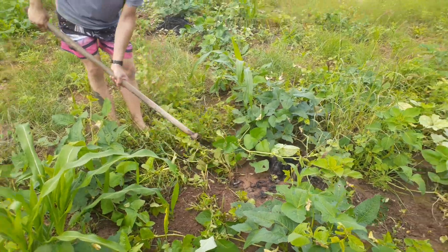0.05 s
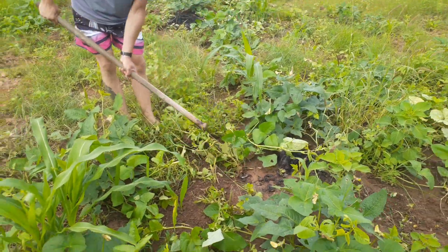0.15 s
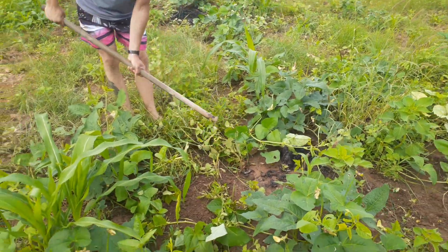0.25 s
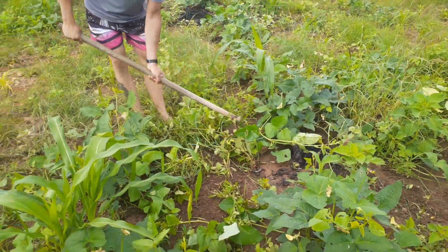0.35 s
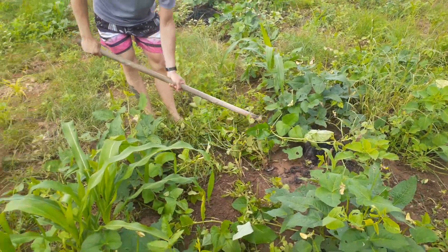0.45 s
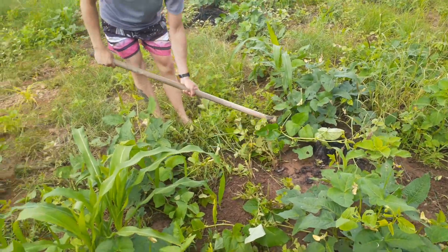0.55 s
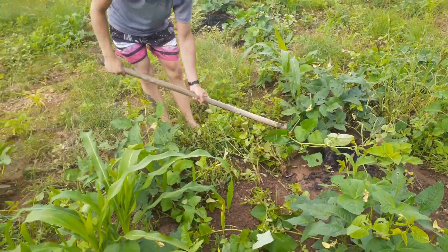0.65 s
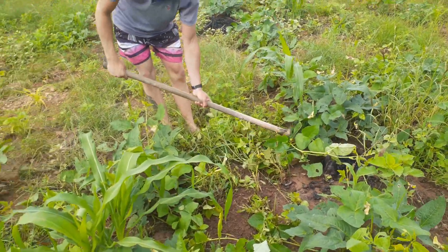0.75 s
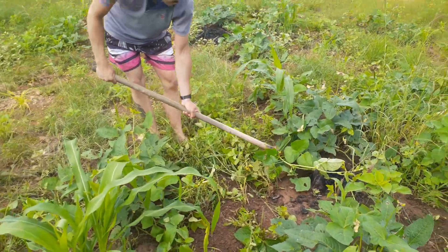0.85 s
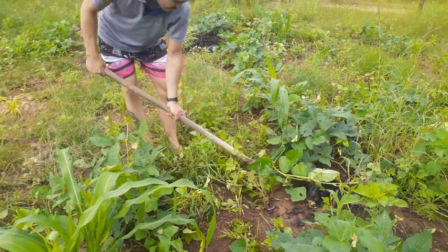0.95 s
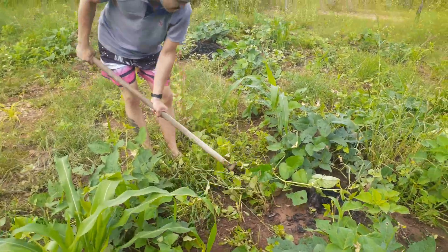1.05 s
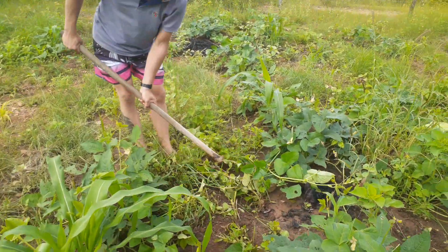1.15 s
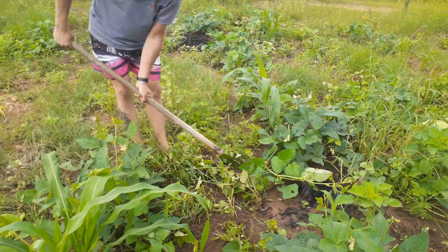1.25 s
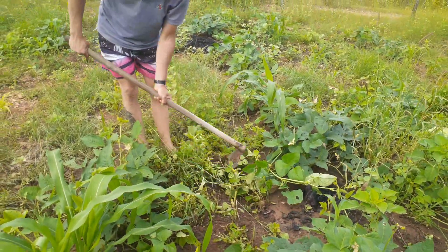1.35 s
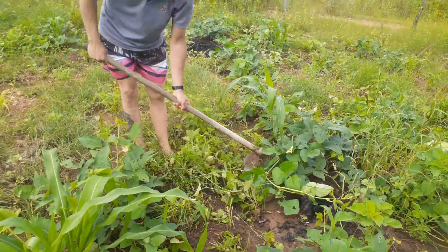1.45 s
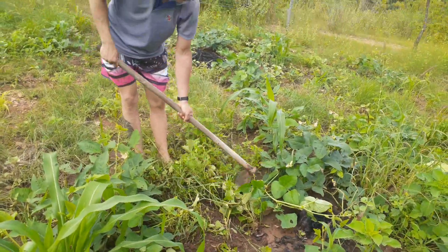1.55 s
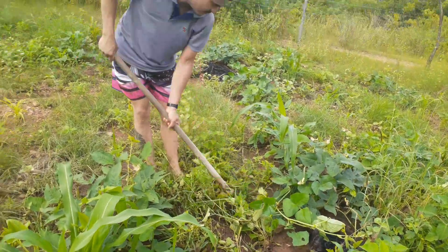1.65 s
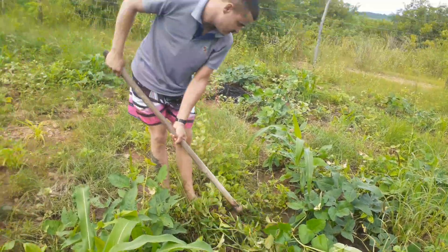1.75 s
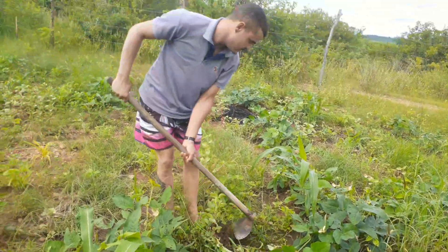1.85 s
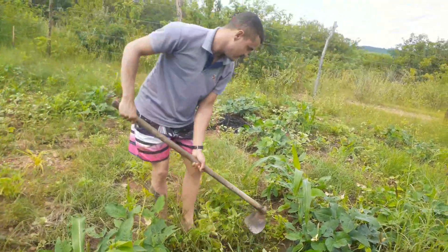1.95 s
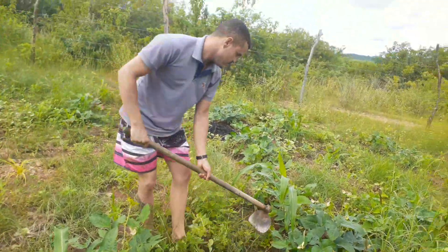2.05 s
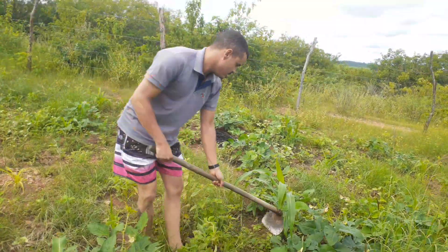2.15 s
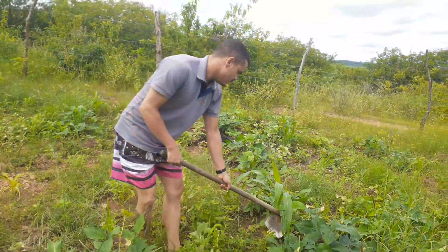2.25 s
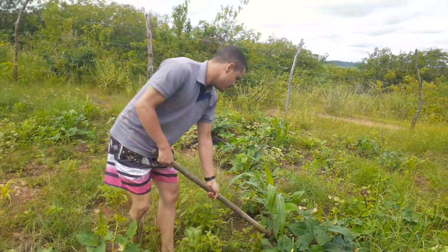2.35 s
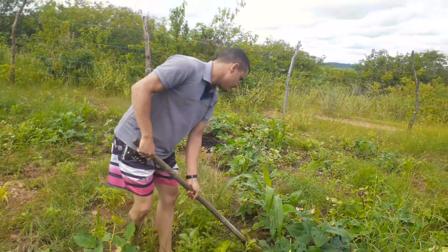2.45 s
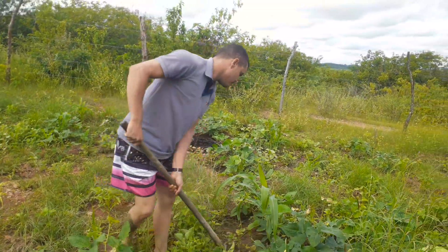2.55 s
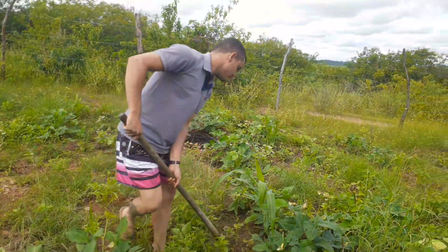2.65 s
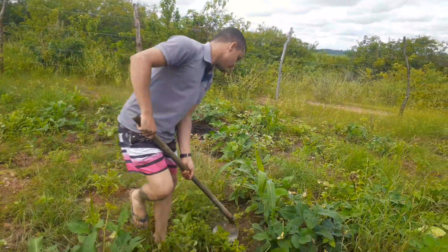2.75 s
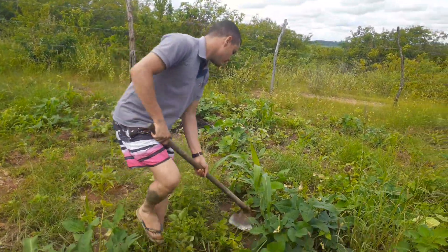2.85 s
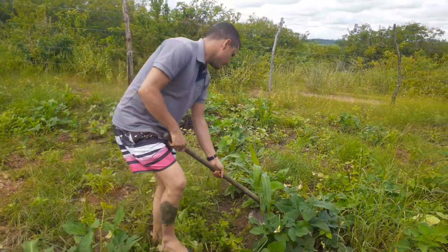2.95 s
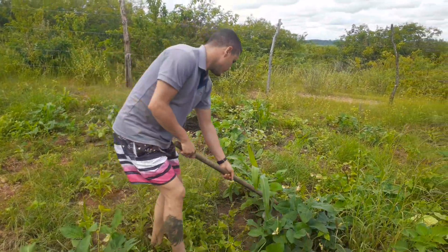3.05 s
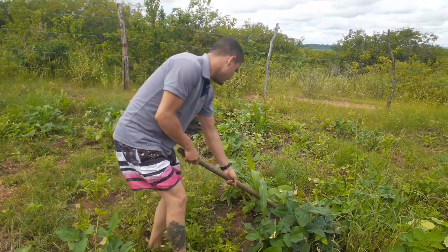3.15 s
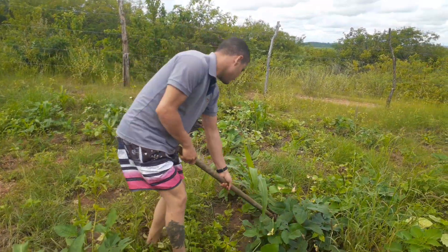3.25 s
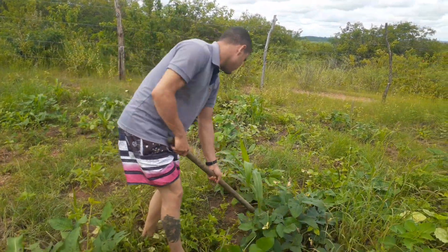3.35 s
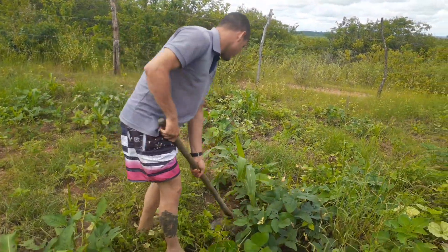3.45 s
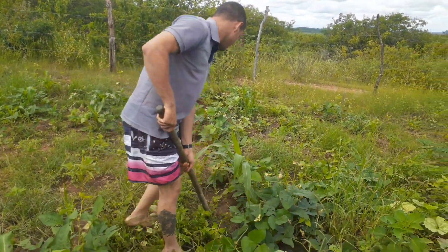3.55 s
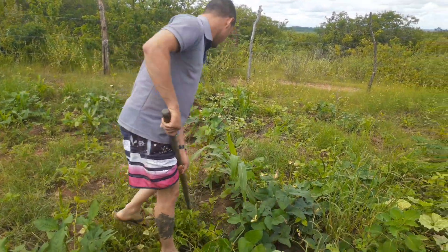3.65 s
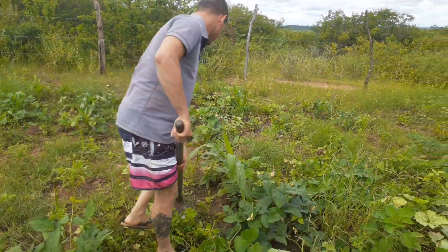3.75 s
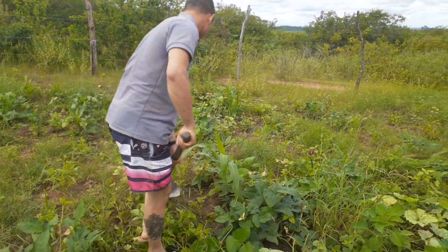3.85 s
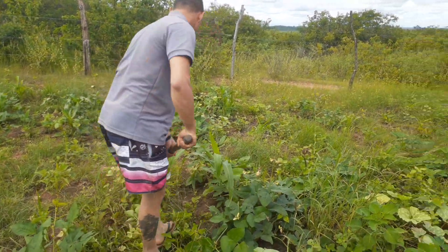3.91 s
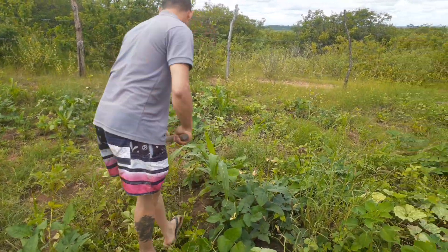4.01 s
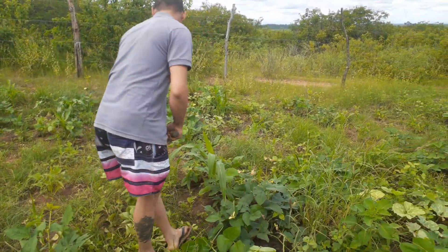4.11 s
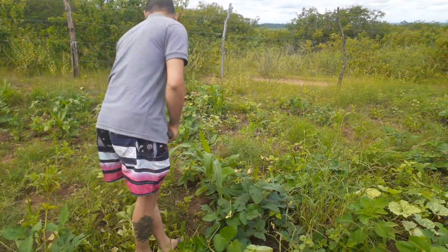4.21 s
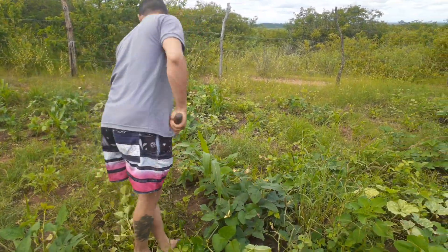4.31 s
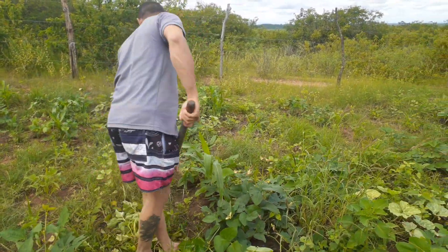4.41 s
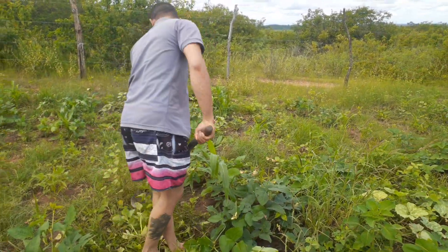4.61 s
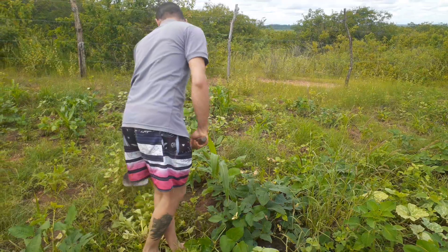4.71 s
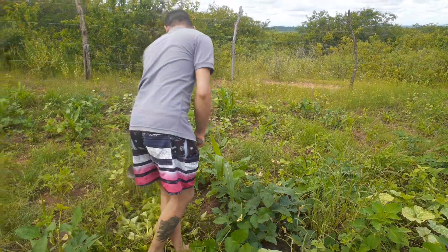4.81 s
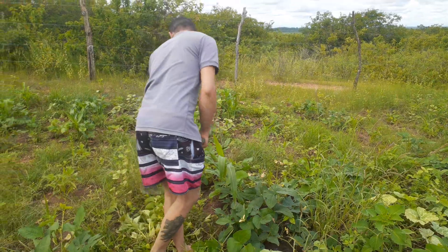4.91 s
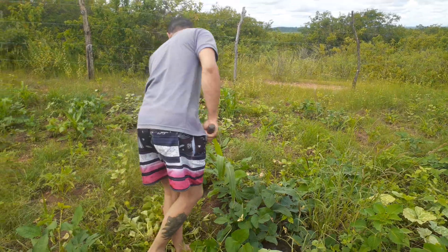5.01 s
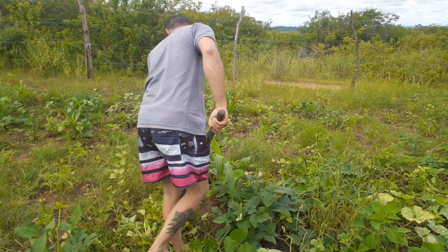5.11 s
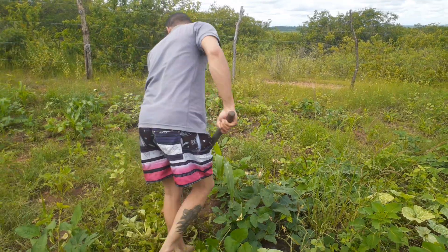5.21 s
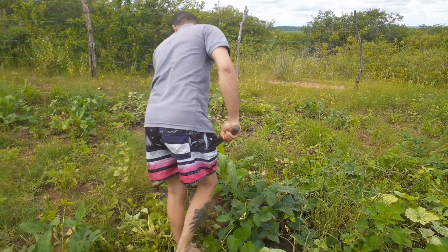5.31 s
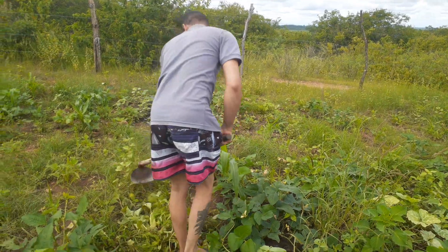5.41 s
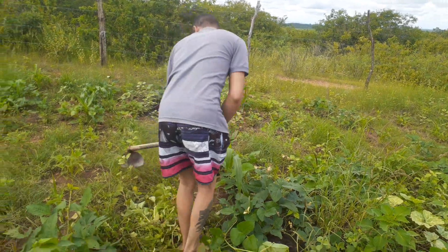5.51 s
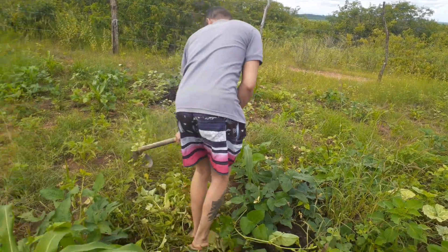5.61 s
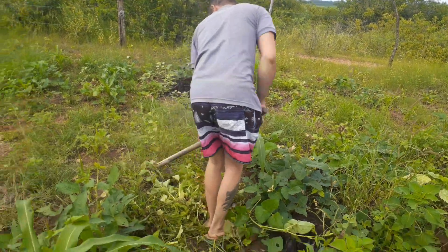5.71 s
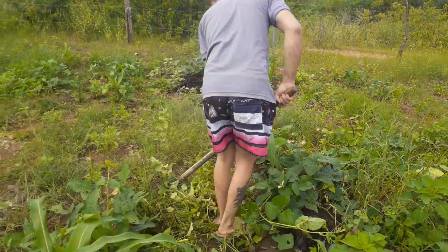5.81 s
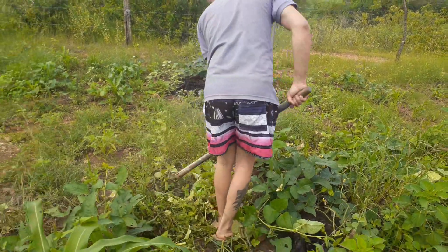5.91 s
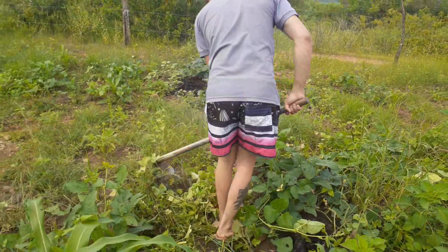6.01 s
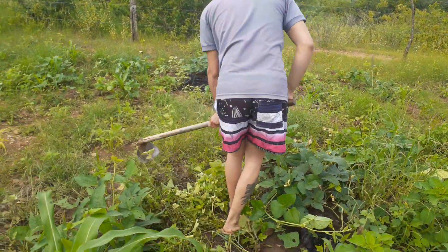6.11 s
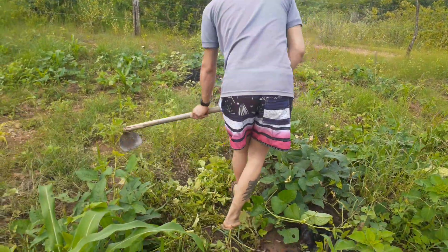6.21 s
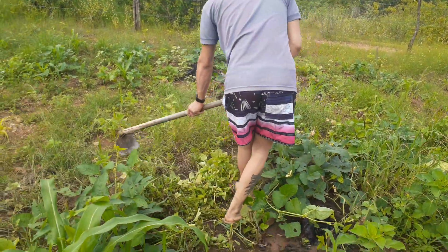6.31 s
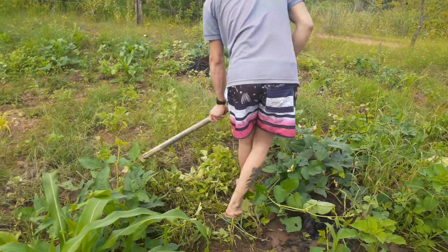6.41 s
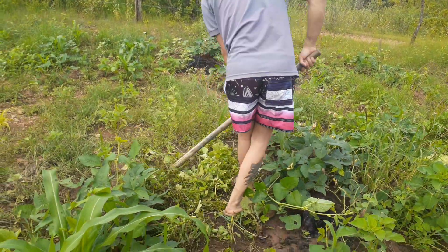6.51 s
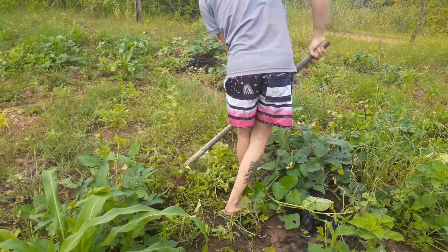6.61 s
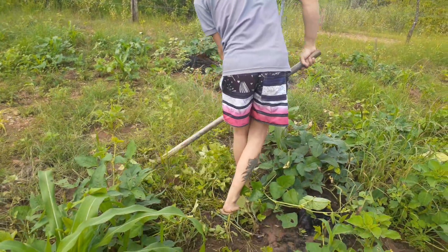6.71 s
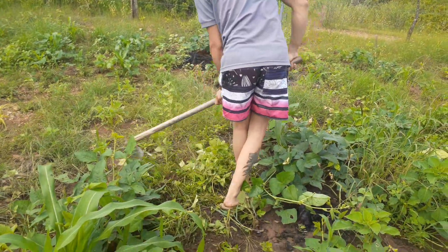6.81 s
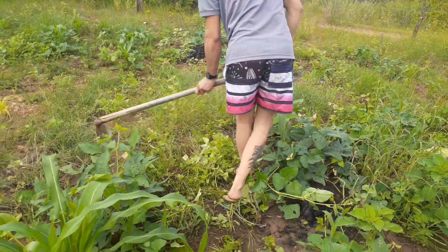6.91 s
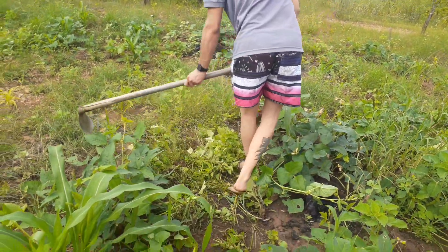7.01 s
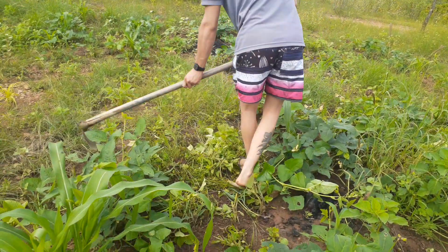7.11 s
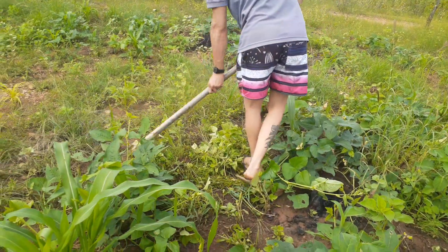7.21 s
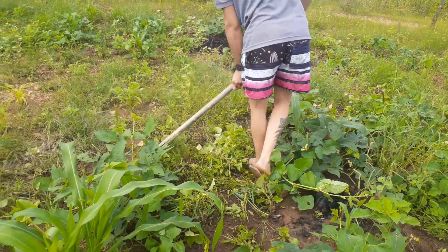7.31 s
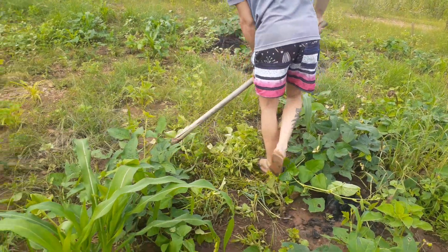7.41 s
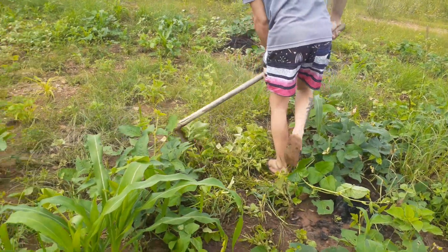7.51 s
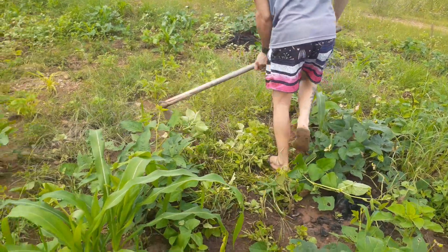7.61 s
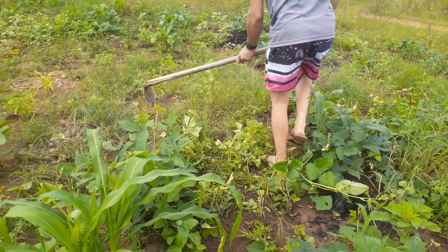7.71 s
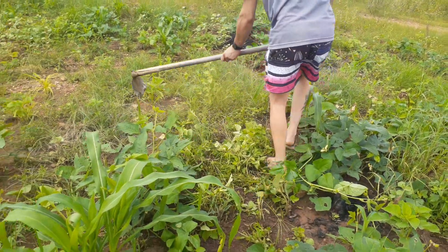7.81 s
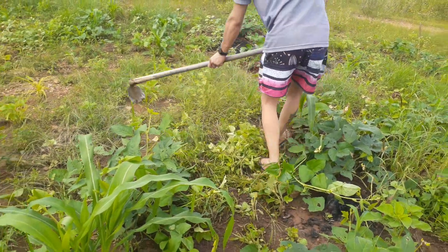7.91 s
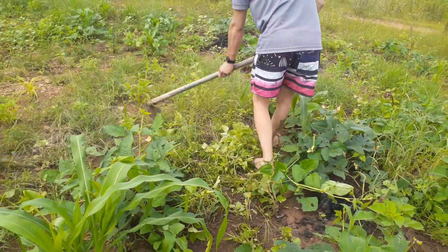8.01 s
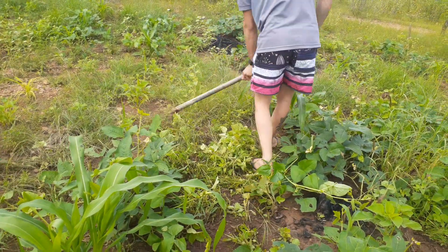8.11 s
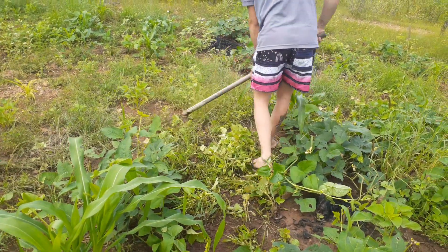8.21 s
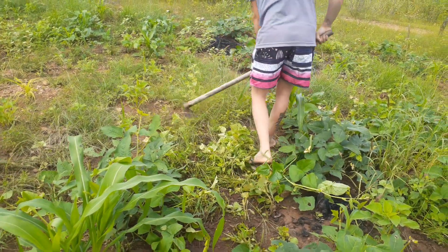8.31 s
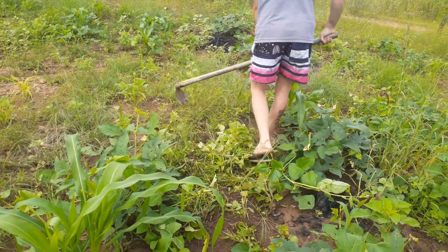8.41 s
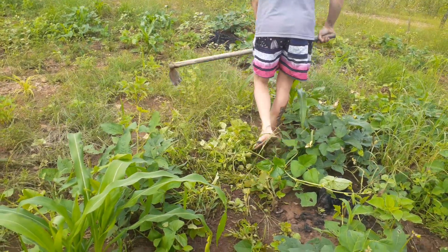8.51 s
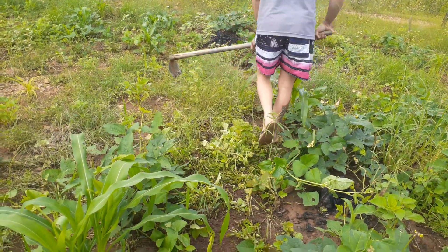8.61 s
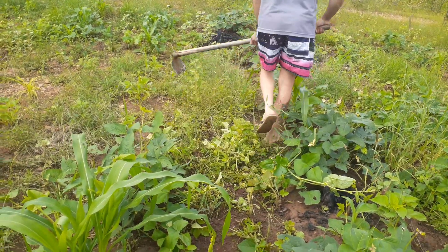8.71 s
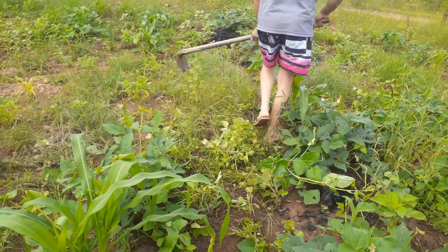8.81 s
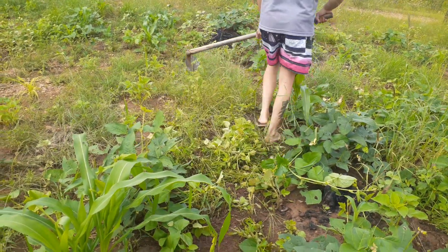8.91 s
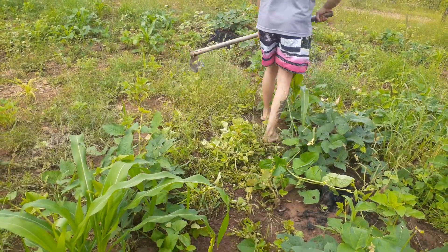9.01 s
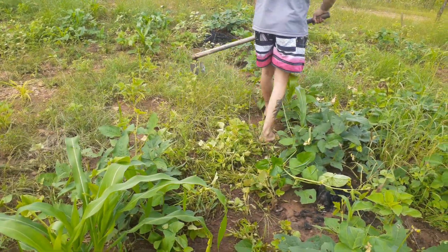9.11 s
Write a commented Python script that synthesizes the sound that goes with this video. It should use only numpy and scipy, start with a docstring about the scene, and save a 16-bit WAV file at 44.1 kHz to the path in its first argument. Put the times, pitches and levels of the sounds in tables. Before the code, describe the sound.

Outdoors in an open field, a steel hoe on a wooden handle chops through soil and weeds at a steady pace. Each stroke is a tight cluster of gritty cracks with a short dull blade ring and woody knock, then crumbs slide and leaves rustle. Early strokes are soft, the middle ones hardest, the last lighter before only rustling remains. Close dry stereo microphone, faint hiss, small wind bumps on the left and distant bird chirps.

```python
"""A hoe chops into soil and weeds in an open field: each stroke is a few blows of gritty noise exciting a steel
blade and a wooden handle. Between them shaped grain noise crackles as sliding earth and rustling leaves.
Narrow noise bands swish past the tool and soft grains ring the lifted blade. Two far birds call in gliding
near-sines, light wind bumps the left microphone port in low noise and decaying tones, and two circuit tones
whine faintly on the left over field hiss."""
import sys
import numpy as np
from scipy import signal
from scipy.fft import rfft, irfft, next_fast_len
from scipy.io import wavfile
from scipy.ndimage import uniform_filter1d

SR = 44100
rng = np.random.default_rng(int(sys.argv[2]) if len(sys.argv) > 2 else 0)


def generate_wav(signal):
    """Clip the signal to [-1, 1] and save it as 16-bit WAV at the path in sys.argv[1]."""
    frames = np.transpose(np.atleast_2d(signal))
    scaled = np.clip(frames, -1, 1) * 32767
    pcm = np.round(scaled).astype(np.int16)
    wavfile.write(sys.argv[1], SR, pcm)


def makeup_ratio(level_db):
    """Linear amplitude ratio for a level in decibels (20 dB per factor of ten)."""
    decades = np.asarray(level_db, float) / 20
    return 10 ** decades


N = 403515

# modes of the free blade: (frequency [Hz], level [dB], t60 at damping 1 [s])
BLADE_MODES = [(2075, -8, .12), (2692, 2, .25), (3470, -1, .15), (3660, -3, .15), (3850, -7, .1),
               (4450, -4, .18), (4640, -8, .1), (4945, -6, .18), (5455, -8, .18), (5705, -5, .18),
               (6155, -11, .1)]


def evened(x):
    """Scales to rms 1."""
    return x / np.sqrt(np.mean(x ** 2) + 1e-20)


def read(points, hz):
    """Reads a spectrum on a log-frequency axis."""
    f, value = np.transpose(points)
    return np.interp(np.log(hz + 1), np.log(f + 1), value)


def curves(rows):
    """Each column after the first, sample by sample."""
    s, *columns = np.transpose(rows)
    return [np.interp(np.arange(N) / SR, s, c) for c in columns]


def add(mix, s, sound):
    """Mixes a sound in at s seconds."""
    part = mix[..., max(round(s * SR), 0):][..., :sound.shape[-1]]
    part += sound[..., :part.shape[-1]]


def sides(pan_db):
    """Gains for left and right, pan_db apart."""
    return makeup_ratio(np.multiply.outer([.5, -.5], pan_db))


def colour(points):
    """Causal minimum-phase filter of energy 1 with the given spectrum."""
    half = np.log(makeup_ratio(read(points, np.fft.rfftfreq(4096, 1 / SR))))
    full = np.r_[half, half[-2:0:-1]]
    taps = np.fft.ifft(np.exp(full - 1j * signal.hilbert(full).imag)).real[:2048]
    return taps / np.linalg.norm(taps)


def ring(modes, damping):
    """Impulse response of energy 1: decaying sines; damping shortens every mode."""
    t = np.arange(SR // 4) / SR
    taps = sum(makeup_ratio(db - 60 * t * damping / t60) * np.sin(2 * np.pi * hz * t) for hz, db, t60 in modes)
    return taps / np.linalg.norm(taps)


def grains(count, per_s, spread_db, hiss):
    """Sparse clicks of uneven size over a bed of hiss, rms 1."""
    luck, size, noise = rng.random(count), rng.exponential(1, count), rng.standard_normal(count)
    clicks = (luck < per_s / SR) * makeup_ratio(spread_db * np.minimum(size, 4)) * np.sign(noise)
    return evened(evened(clicks) + hiss * noise)


def band(x, lo_hz, hi_hz):
    """Band-pass."""
    return signal.sosfilt(signal.butter(2, [lo_hz, hi_hz], "band", fs=SR, output="sos"), x)


def air():
    """Far field hiss and microphone noise, unrelated left and right, with slowly shifting spectral patches."""
    # relative spectrum: (frequency [Hz], density [dB])
    hiss_spectrum = [(25, -36.5), (60, -9.5), (114, -3.5), (370, -6.5), (800, -14), (1500, -20),
                     (3000, -20.5), (6000, -26), (7500, -33), (9000, -31.5), (9400, -18), (10100, -17),
                     (12800, -20), (13300, -13), (15600, -10.5), (15900, -46)]
    # (frequency [Hz], left-right [dB])
    hiss_sides = [(100, 5), (380, 4.5), (1300, 3), (4400, -5.5), (7000, -7), (9300, 13), (15000, 18)]
    level_db = -71.5
    frames, hz = N // 256 + 5, np.fft.rfftfreq(1024, 1 / SR)
    a, b = rng.standard_normal((2, 2, frames, 513))
    patches = rng.standard_normal((frames, 513))
    patches = evened(uniform_filter1d(uniform_filter1d(patches, 12, 0), 14, 1))
    z = (a + 1j * b) * makeup_ratio(read(hiss_spectrum, hz) + 0.64 * patches)
    gains = sides(read(hiss_sides, hz))
    z *= gains[:, None] / np.hypot(*gains)
    hiss = signal.istft(z.swapaxes(1, 2), nperseg=1024, noverlap=768)[1][:, :N]
    return makeup_ratio(level_db) * evened(hiss)


def whine():
    """Two steady multiples of one circuit tone, slightly wavering, almost only on the left."""
    # (frequency [Hz], relative level [dB])
    tones = [(9524, -65), (14287, -61)]
    drift = 1 + 0.00025 * evened(band(rng.standard_normal(N), 0.22, 13))
    flutter = 1 + 0.25 * evened(band(rng.standard_normal(N), 5, 60))
    tone = sum(makeup_ratio(db + 0.5) * np.sin(2 * np.pi * np.cumsum(hz * drift) / SR) for hz, db in tones)
    return tone * flutter * makeup_ratio(np.array([[0], [-26]]))


def wind():
    """Lumpy low-band rumble, unrelated per port, and single bumps of a decaying low tone plus noise."""
    # rumble, mean of both sides in dB: (time [s], level [dB])
    rumble_level = [(0.0, -74), (0.38, -80), (1.02, -71), (1.35, -82), (1.78, -68.5), (2.24, -84),
                    (2.68, -74), (2.98, -83.5), (3.34, -73.5), (4.71, -91.5), (5.76, -70), (5.96, -78.5),
                    (7.26, -81.5), (8.28, -87), (8.79, -86), (9.15, -88)]
    # gusts bumping the microphone: (time [s], level [dB], frequency [Hz], left-right [dB], t60 [s])
    bumps = [(0.009, -31.5, 121, 25.5, 0.031), (0.15, -47.5, 65, 23, 0.11), (0.261, -65, 110, 22, 0.15),
             (0.399, -54, 99.6, 23, 0.069), (0.7, -57.5, 76, 24, 0.14), (1.881, -54, 136, 28, 0.12),
             (4.565, -47, 115, 7, 0.14), (5.368, -55, 83.1, 24, 0.099), (7.01, -52, 95, 9.5, 0.11)]
    lumps = makeup_ratio(3 * evened(band(rng.standard_normal((2, N)), 3, 18)))
    rumble = evened(band(rng.standard_normal((2, N)), 45, 140) * lumps)
    out = rumble * makeup_ratio(curves(rumble_level)[0]) * sides(20)[:, None]
    t = np.arange(SR // 4) / SR
    for s, db, hz, pan_db, t60 in bumps:
        push = np.sin(2 * np.pi * hz * t) + .5 * evened(band(rng.standard_normal(len(t)), 38, 200))
        envelope = makeup_ratio(db - 60 * t / t60) * (1 - np.exp(-t / 0.0047))
        add(out, s, envelope * push * sides(pan_db)[:, None])
    return out


def whistle(note, db):
    """A near-sine gliding along one note shape, its pitch a little different each time."""
    s, hz, level_db = np.transpose(note)
    t = np.arange(0, s[-1], 1 / SR)
    turns = np.cumsum(np.interp(t, s, hz)) * rng.normal(1, 0.0039) / SR
    return makeup_ratio(db + np.interp(t, s, level_db)) * np.sin(2 * np.pi * turns)


def birds():
    """One bird trills one figure eleven times, another drops single notes; bushes smear them."""
    # note shapes: (time [s], frequency [Hz], level against the call [dB])
    trill_note = [(0, 2794, -35), (.004, 3076, -3), (.016, 3266, 2.5), (.019, 4014, -14),
                  (.023, 4076, -6.5), (.03, 3266, -1.5), (.034, 3220, -23.5), (.038, 2850, -24.5),
                  (.043, 2813, 2.5), (.05, 2480, 4), (.057, 2195, -35)]
    fall_note = [(0, 3400, -20), (.004, 3300, -2), (.016, 2950, 0), (.023, 2750, -20)]
    arch_note = [(0, 2670, -30), (.01, 2980, 8), (.028, 3080, -3), (.04, 3730, 0), (.05, 3300, -7),
                 (.058, 2900, 11), (.066, 2700, -36)]
    # calls before panning: (time [s], level [dB])
    fall_calls = [(.118, -75.5), (.233, -77), (.353, -71), (6.59, -63), (6.706, -73), (6.822, -73)]
    arch_calls = [(0.422, -78), (6.893, -77)]
    trill_start_s, trill_step_s, trill_db = 4.521, .0836, -68
    out = np.zeros(N)
    for k in range(11):
        add(out, trill_start_s + k * trill_step_s, whistle(trill_note, trill_db))
    for note, calls in ((fall_note, fall_calls), (arch_note, arch_calls)):
        for s, db in calls:
            add(out, s, whistle(note, db))
    t = np.arange(SR // 5) / SR
    echoes = rng.standard_normal((2, len(t))) * makeup_ratio(-37.5 - 60 * t / .3)
    smeared = signal.oaconvolve(out[None], echoes, axes=1)[:, :N]
    return (out + smeared) * sides(-19)[:, None]


def swing():
    """Air and leaves swish past the moving tool: narrow noise bands that swell and fade."""
    # low when the handle swings: (start [s], length [s], centre [Hz], width [Hz], level [dB])
    swishes = [(0.878, 0.18, 3500, 900, -63), (1.179, 0.4, 376, 146, -72), (1.239, 0.25, 2060, 800, -79),
               (2.896, 0.095, 1254, 200, -69), (2.947, 0.28, 364, 180, -76.5), (3.75, 0.34, 381, 182, -73),
               (5.248, 0.39, 386, 178, -73), (6.08, 0.3, 377, 169, -69), (8.4, 0.36, 371.3, 169.7, -77.5)]
    out = np.zeros(N)
    for s, length_s, hz, width_hz, db in swishes:
        count = round(max(length_s, .03) * SR)
        hiss = band(rng.standard_normal(count), hz - width_hz / 2, hz + width_hz / 2)
        add(out, s, makeup_ratio(db) * evened(hiss) * np.hanning(count) ** 0.43)
    return out


def brushes():
    """Stems brush the lifted blade: soft grains excite its free modes."""
    # (start [s], length, at least 0.03 [s], level of the grains [dB])
    touches = [(0.288, 0.17, -71.5), (1.6, 0.12, -60), (2.553, 0.077, -63.5), (2.863, 0.1, -61),
               (5.393, 0.059, -65), (5.955, .05, -66), (6.197, 0.07, -63), (6.707, 0.09, -61.5),
               (6.829, 0.043, -60), (7.684, 0.13, -82), (8.192, 0.029, -67), (8.251, 0.24, -74.5)]
    out = np.zeros(N)
    for s, length_s, db in touches:
        count = round(max(length_s, .03) * SR)
        add(out, s, makeup_ratio(db) * grains(count, 320, 4, 0.3) * np.hanning(count) ** .5)
    out = signal.oaconvolve(out, ring(BLADE_MODES, damping=1))[:N]
    return np.array([out, np.roll(out, 9)])


def stirring(faster, dull):
    """Gain of the moving earth and leaves; dull blends in the scrape's own level, faster speeds its decay."""
    # blade in the ground: (enters [s], leaves [s], crumbling on entry [dB], on leaving [dB],
    # scrape against it, times dull [dB], settling at faster 1, at least 0.02 [s per 20 dB])
    strokes = [(0.927, 1.155, -71, -70, 4.5, 0.13), (1.651, 1.77, -56.5, -71.5, -0.5, 0.55),
               (2.432, 2.537, -66.5, -55, -1.5, .2), (3.31, 3.609, -71, -57, 0, -0.07),
               (4.332, 4.49, -52.5, -60, -3, -0.24), (5.017, 5.194, -56, -64.5, 0, 0.54),
               (5.706, 5.897, -52, -62, -6, .5), (6.445, 6.561, -59, -59.5, -1, 0.23),
               (7.254, 7.288, -69, -56.5, 4.5, 0.1666), (8.094, 8.259, -62.5, -60.5, -13, 0.07)]
    # tool and feet sweeping through leaves and loose earth: (loudest [s], swell and fade at faster 1,
    # each at least 0.02 [s per 20 dB], level [dB], scrape against it, times dull [dB])
    sweeps = [(.05, 26, 0.1, -65, -0.5), (.386, 0.43, 0.73, -70.5, -6.5), (1.044, 0.17, 0.14, -55.5, 3.5),
              (1.498, 0.5, .09, -73.5, -6), (2.102, 0.1, .27, -63, -8), (3.035, 0.14, 0.2, -55.5, -12),
              (3.32, 0.5, 0.4, -77, 8), (4.038, .5, -0.46, -65.5, -15), (4.22, 1.44, 2.3, -68, -16.5),
              (5.484, 0.7, 0.15, -61, -12), (5.825, 0, .13, -52.5, -4), (6.533, 0.0556, 0.074, -43.5, -2),
              (6.858, 0.35, 0.13, -64, -25), (7.705, .02, .5, -69, -11), (7.831, 0.5, 0.24, -71, -4),
              (8.24, 0.02, -0.05, -50, -14), (8.5, 0.4, 0.22, -74, -17), (9.06, -0.24, .3, -74.5, -2)]
    entry_s_per_20db = 0.039  # weeds bend before entry
    late_db, late_slower = -15.5, 3.5  # last crumbs trickle on
    leaves_db = -90.5  # leaves that never quite rest
    t = np.arange(0, N + 64, 64) / SR
    power = makeup_ratio(2 * (leaves_db - 12 * dull))
    for start, end, in_db, out_db, dull_db, settle in strokes:
        before = np.maximum(start - t, 0)
        after_db = faster * 20 * np.maximum(t - end, 0) / max(settle, .02)
        db = np.interp(t, [start, end], [in_db, out_db]) + dull * dull_db - 20 * before / entry_s_per_20db
        late = (t > end) * makeup_ratio(2 * (db + late_db - after_db / late_slower))
        power = power + makeup_ratio(2 * (db - after_db)) + late
    for s, swell, fade, db, dull_db in sweeps:
        away = np.where(t < s, (s - t) / max(swell, .02), (t - s) / max(fade, .02))
        power = power + makeup_ratio(2 * (db + dull * dull_db - faster * 20 * away))
    return np.interp(np.arange(N) / SR, t, np.sqrt(power))


def drag():
    """Crumbs and leaves crackle in clumps, now here, now there in the spectrum."""
    # relative spectrum: (frequency [Hz], density [dB])
    rustle_spectrum = [(880, -41), (1500, -17.5), (2030, -11), (2580, 0), (5750, 2), (8340, -25),
                       (9220, -14.5), (12800, -5), (14800, -4.5), (16000, -13), (16500, -32)]
    rustle_gain, scrape_gain = stirring(1, 0), stirring(1.8, 0.92)
    clumps = makeup_ratio(1.2 * evened(band(rng.standard_normal(N), 18, 80)))
    patches = rng.standard_normal((257, N // 128 + 9))
    patches = makeup_ratio(2.2 * evened(uniform_filter1d(uniform_filter1d(patches, 8, 0), 30, 1)))
    paths = []
    for path in range(2):  # many small sources: each path sums them differently
        crumbs = grains(N, 4000, 2.7, 1.4) * clumps * rustle_gain
        crumbs = signal.oaconvolve(crumbs, colour(rustle_spectrum))[:N]
        ticks = grains(N, 420, 4.7, 0.21) * clumps * rustle_gain  # some tick the steel
        crumbs += makeup_ratio(-10.5) * signal.oaconvolve(ticks, ring(BLADE_MODES, damping=1.2))[:N]
        scrape = evened(band(grains(N, 1200, 3, 0.66) * clumps, 430, 3000)) * scrape_gain
        z = signal.stft(crumbs + scrape, nperseg=512, noverlap=384)[2]
        patchy = signal.istft(z * patches[:, :z.shape[1]], nperseg=512, noverlap=384)[1]
        paths.append(patchy[:N])
    return np.array(paths) * sides(-0.45)[:, None, None]


def blows():
    """Each blow is one crack and a dying spray of grit on the blade, and a shove that knocks handle and ground."""
    # (time [s], level [dB], relative handle knock [dB], knock pitch [Hz], grit fall [dB per 10 ms, at least 3,
    # applied x1.5])
    hits = [(0.965, -39, -4.5, 1170, 10.5), (1.018, -37, -14, 1100, 16), (1.094, -42.5, -4, 740, 18),
            (1.123, -28.5, -2, 747, 16), (1.658, -24, -22, 1130, 10), (1.687, -28.5, -10.5, 880, 1.5),
            (1.742, -31.5, -5, 770, 15.5), (2.436, -15, -13, 1040, 10), (2.461, -11.5, -11.5, 1120, 10),
            (2.4696, -13.5, -11.5, 1420, 9), (2.492, -30, -8, 1385, 5.5), (3.281, -20.5, -14.5, 1230, 4),
            (3.294, -25, -11.5, 990, 8.5), (3.337, -43.5, 3.5, 1000, 7.5), (3.37, -44.5, 3, 964, 14),
            (3.385, -49.5, 5, 900, 5), (3.485, -34, -8, 1130, 2.5), (3.527, -45.5, 3.5, 1120, -1),
            (3.562, -24.5, -17, 1140, 10), (3.624, -43, -2.5, 1060, 3), (4.344, -15, -22, 1100, 7.5),
            (4.3482, -10, -10, 1057, 11.5), (4.351, -8.5, -16, 1050, 12), (4.409, -13.5, -11.5, 1060, 14),
            (4.422, -26, -5, 1135, 7.5), (4.446, -21, -11, 1134, 7), (5.02, -27.5, -7, 1180, 6),
            (5.027, -19.5, -10.5, 880, 8.5), (5.038, -26.5, -5.5, 1130, 5), (5.063, -26, -6, 1140, 8),
            (5.105, -13, -7, 1160, 8), (5.143, -26, -3, 1290, 7.5), (5.238, -43.5, -10.5, 1270, 7.5),
            (5.704, -22.5, -16, 1070, 3), (5.732, -34, 1, 950, 13), (5.754, -32.5, 0.5, 1030, 10.5),
            (5.83, -26, -13.5, 1190, 4), (5.846, -26, -5.5, 920, 6), (5.861, -15, -11, 1000, 8.5),
            (5.868, -24, -7, 766, 10), (6.436, -33.5, -20, 1270, 2.5), (6.45, -9, -7, 762, 5),
            (6.473, -20.5, -20, 875, 6.5), (7.251, -16, -20, 1190, 4.5), (7.275, -35, -2, 1156, 2),
            (8.111, -33, -9.5, 1010, 4.5), (8.127, -20.5, -10.5, 1930, 12.5), (8.139, -31, -15, 970, 3),
            (8.157, -34, -13, 914, 3), (8.191, -31.5, -16, 910, 3.5)]
    # (frequency [Hz], level [dB], t60 at damping 1 [s])
    handle_modes = [(368, -2, 0.065), (442, -1.5, 0.064), (762, -5, 0.051), (1100, -4, 0.11),
                    (1190, -10, 0.012), (1750, -6, 0.1)]
    # relative spectrum: (frequency [Hz], density [dB])
    grit_spectrum = [(710, -35), (1200, -6.5), (1920, -10), (2760, -2), (3880, -8.5), (4140, -12),
                     (4780, -5.5), (6360, -17), (8180, -32.5), (10900, -18), (15100, -29), (16000, -22),
                     (16500, -44.5)]
    ring_db, ring_loss_db = -6.5, 0.74  # blade against grit; loss per unit of fall: short dead blows ring less
    t = np.arange(SR // 5) / SR - .03
    after = np.maximum(t, 0)
    crack = np.diff(t > .0006, prepend=False) * 1.  # one-sample impulse
    steel = ring(BLADE_MODES, damping=2.2)  # soil shortens the modes
    crunch, wood = colour(grit_spectrum), ring(handle_modes, damping=1.5)
    # stems bend before the blade lands, crumbs fall after
    weeds = makeup_ratio(-29.0 - 2000 * np.maximum(-t, 0) - 230 * after)
    out = np.zeros((2, 2, N))
    for s, db, knock_db, hz, fall_db in hits:
        dying_db = 1.5 * 100 * max(fall_db, 3) * after
        hit = (1 - np.exp(-after / 0.00028)) * makeup_ratio(-dying_db)
        # fast-falling blows start with the hardest crack
        spray = grains(len(t), 6000, 3.6, 0.11) * (hit + weeds) + 0.47 * fall_db * crack
        shove = grains(len(t), 2500, 4.2, 0.56) * (hit ** 0.78 + .2 * weeds) + 8 * crack
        grit = signal.fftconvolve(spray, crunch)[:len(t)]
        blade = makeup_ratio(ring_db - ring_loss_db * fall_db) * signal.fftconvolve(spray, steel)[:len(t)]
        contact = ring([(hz, 0, .038)], damping=0.98)  # the pitch depends on how deep the blade sits
        knock = signal.fftconvolve(shove, wood + 2.2 * contact)[:len(t)]
        knock = knock + 4 * band(shove, 110, 1800)  # ground
        bright = 0.018 * evened(grit + blade) * np.sqrt(max(fall_db, 3))
        sound = bright + makeup_ratio(knock_db - 19) * evened(knock)
        # the second path differs by some centimetres
        paths = np.array([sound, np.roll(sound, rng.integers(-12, 13))])
        paths = paths * signal.windows.tukey(len(t), .2)
        add(out, s + t[0], makeup_ratio(db) * sides(-0.98)[:, None, None] * paths)
    return out


def ports(x):
    """x is port, path, time: ports share the direct path in the bass; in the treble the right hears another."""
    # (frequency [Hz], left-right [dB])
    port_sides = [(100, 6), (380, 9.5), (700, 8.5), (1300, 3), (2400, -0.5), (3500, -4), (4600, -8.5),
                  (5000, -8), (6500, -17), (8100, -7.5), (10000, -2.5), (15000, 9)]
    # (frequency [Hz], left-right likeness [0..1])
    likeness = [(500, 0.92), (1200, 0.95), (2200, 0.12), (3500, 0.067), (15000, .05)]
    size = next_fast_len(N + 2048)
    hz = np.fft.rfftfreq(size, 1 / SR)
    same, z = np.clip(read(likeness, hz), 0, 1), rfft(x, size)
    heard = np.array([z[0, 0], same * z[1, 0] + np.sqrt(1 - same ** 2) * z[1, 1]])
    thin = hz ** 2 / np.hypot(hz ** 2, 110 ** 2)  # a small source sends out little deep bass
    return irfft(heard * thin * sides(read(port_sides, hz)), size)[:, :N]


def scene():
    """Everything in the field as it reaches the two ports."""
    tool = blows() + drag() + brushes() + swing()
    return ports(tool) + air() + wind() + birds() + whine()


def roll_off(x):
    """The treble ends steeply here."""
    return signal.sosfilt(signal.butter(12, 16820, fs=SR, output="sos"), x)


def record(dry):
    """Takes the scene as the finished mix."""
    return roll_off(dry)


dry = scene()
out = record(dry)
generate_wav(out)
```